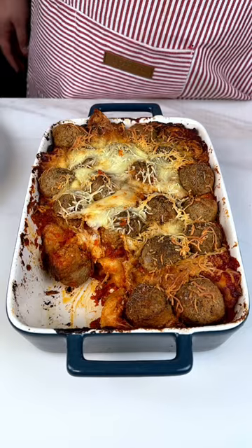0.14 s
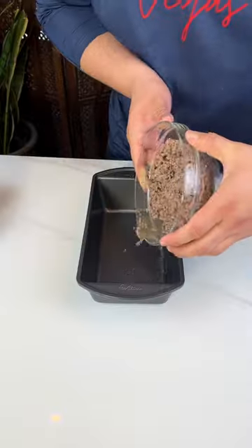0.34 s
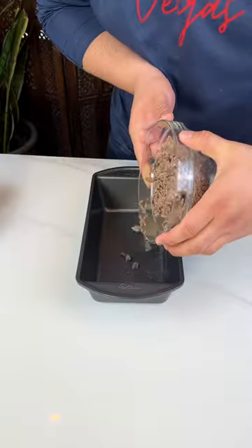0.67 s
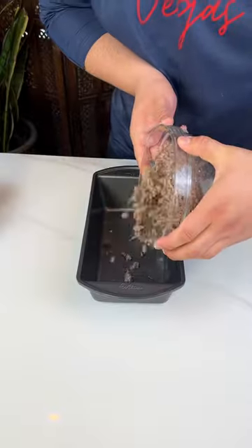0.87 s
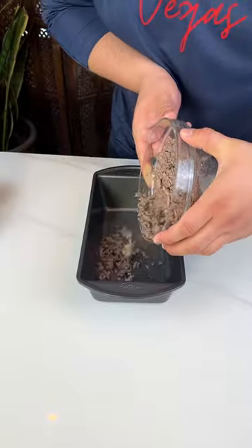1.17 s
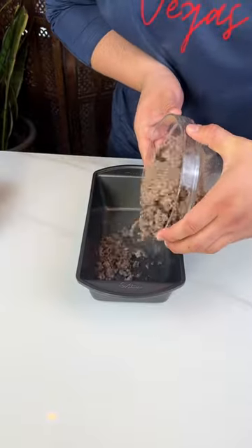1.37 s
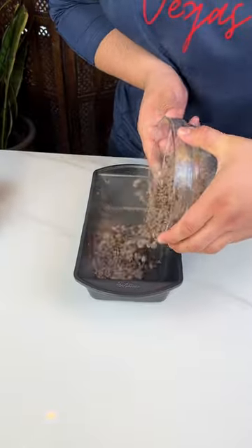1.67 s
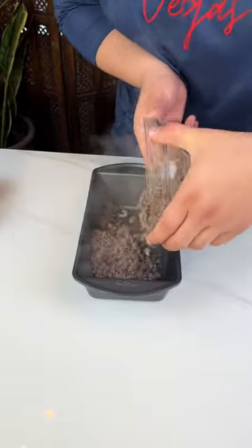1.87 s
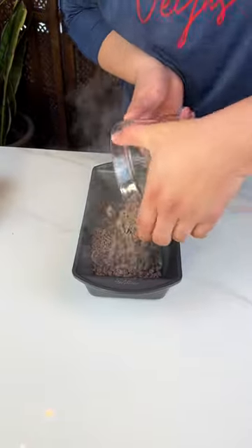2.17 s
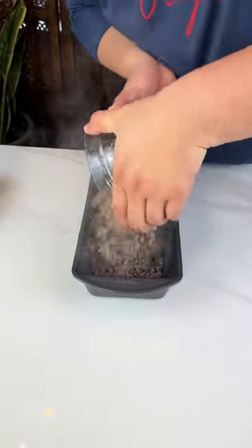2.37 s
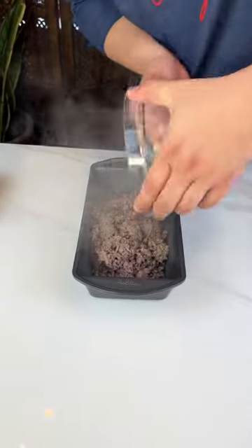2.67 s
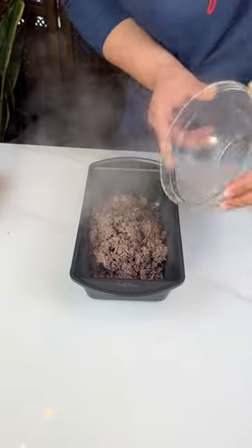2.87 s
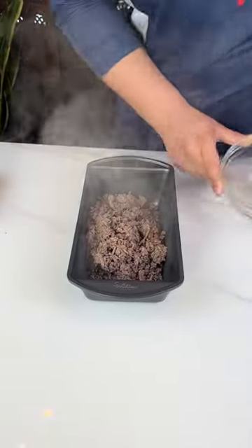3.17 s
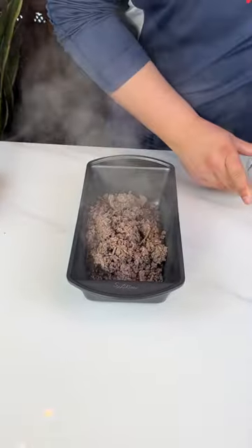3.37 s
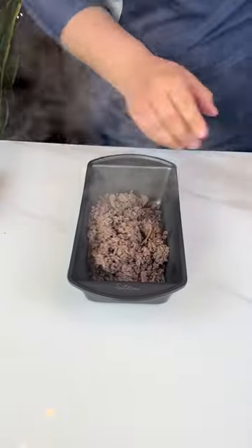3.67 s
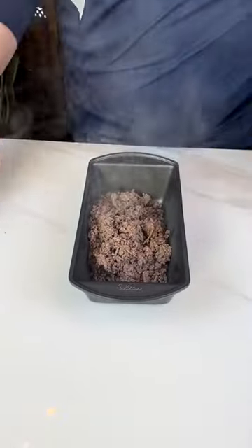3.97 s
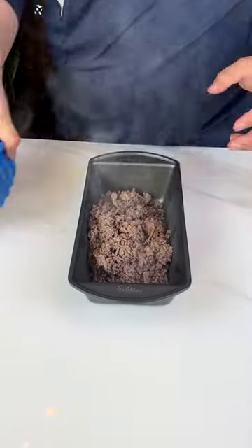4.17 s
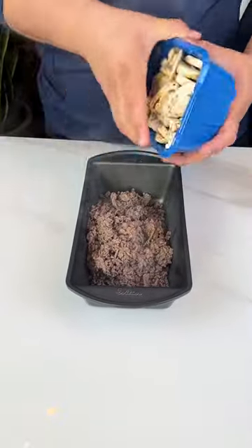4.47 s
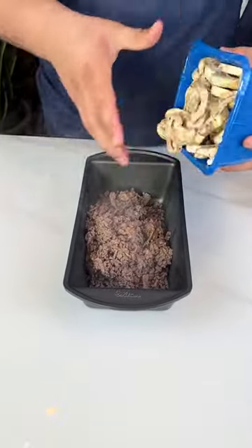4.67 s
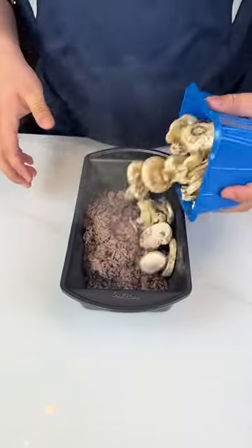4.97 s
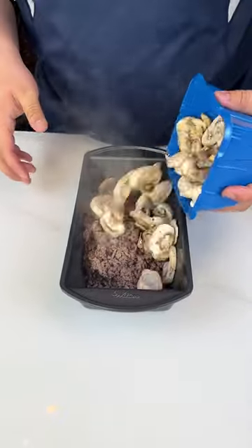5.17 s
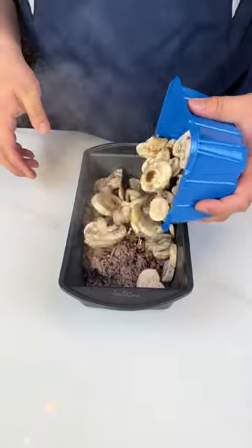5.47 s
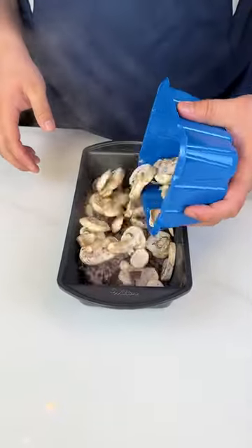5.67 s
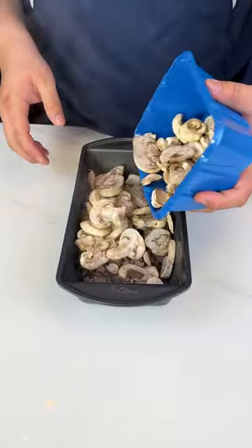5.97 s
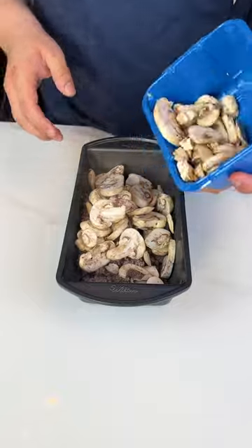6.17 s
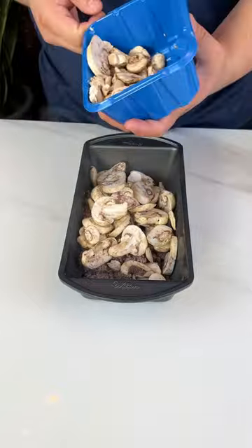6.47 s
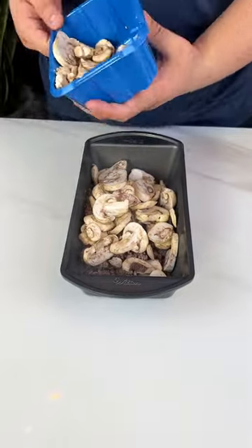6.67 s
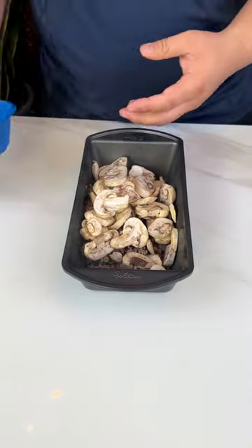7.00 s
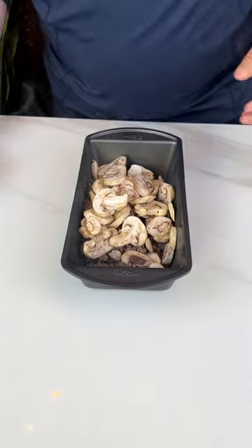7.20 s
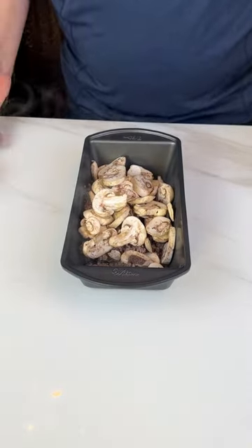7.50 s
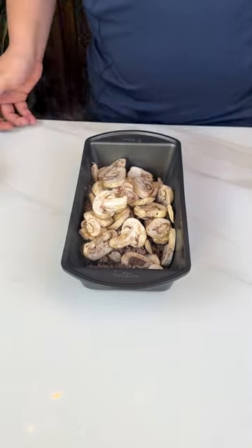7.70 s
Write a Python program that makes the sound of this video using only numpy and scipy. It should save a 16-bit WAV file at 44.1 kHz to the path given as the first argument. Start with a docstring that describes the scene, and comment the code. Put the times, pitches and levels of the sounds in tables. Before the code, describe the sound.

Close kitchen sounds: glass clanking on metal, soft wet food tumbling, two hard countertop knocks, mushrooms thudding into a pan, a plastic tub set down.

```python
"""Cooked mince, then sliced mushrooms, tumble into a metal loaf pan: slaps, pitched plops, wet ticks, bumps.
A glass bowl clanks on the pan twice, then knocks twice on the countertop: noise bursts plus dying modes.
A thin plastic tub crinkles, creaks and scuffs in clusters of noise snaps, and is put down hard.
Behind them lie sleeve swishes and a small, live kitchen: shaped noise with a low rumble and a faint hum.
A close microphone pair turns front and surrounding sound into stereo by mid and side."""
import sys
import numpy as np
from scipy import signal
from scipy.fft import rfft, irfft, next_fast_len
from scipy.io import wavfile
from scipy.ndimage import uniform_filter1d

SR = 44100
rng = np.random.default_rng(int(sys.argv[2]) if len(sys.argv) > 2 else 0)


def wrap_up_sound(samples):
    """Save the sound to the file named by the first command line argument, as 16-bit audio."""
    columns = np.atleast_2d(samples).T
    # keep every value between -1 and 1, then stretch to whole-number steps
    tamed = np.clip(columns, -1, 1)
    steps = np.round(tamed * 32767).astype(np.int16)
    wavfile.write(sys.argv[1], SR, steps)


N = 345826  # length [samples]

# --- all levels are set ahead of the stereo pair; spectrum levels are relative ---
# kitchen noise spectrum: (frequency [Hz], density [dB per Hz])
AIR_SPECTRUM = [(20, -54.5), (36, -10.5), (70, -3), (105, 2.5), (160, -15), (215, -16.5), (300, -17.5),
                (500, -22.5), (1000, -23.5), (2600, -31.5), (3700, -39.5), (7000, -45), (10000, -57.5),
                (13000, -92.5), (16000, -76)]
# a low drone and bands of hiss standing out of it: (frequency [Hz], half width [Hz], boost [dB])
AIR_PEAKS = [(152.4, 3.8, 13), (3070, 102, 6), (4450, 170, 3.5), (6000, 230, 6)]
# kitchen reverberation, time to fall 60 dB: (frequency [Hz], decay [s])
ROOM_T60 = [(100, 0.48), (300, 0.37), (1000, 0.34), (2500, 0.32), (6000, 0.34), (14000, 0.26)]
# reflections off countertop, cupboards and wall: (delay [s], level [dB])
ECHOES = [(0.0023, -26), (0.0061, -19.5), (0.0108, -20)]
# side against mid for sound from the front: (frequency [Hz], level [dB])
FRONT_SIDE = [(60, -76), (250, -42), (700, -10.5), (1500, -7.5), (2100, -9.5), (2800, 4), (4000, -1.5),
              (4800, 1), (5700, -8), (9000, 10.5), (14000, 11.5)]
# side level of sound from all round: (frequency [Hz], level [dB])
ROUND_SIDE = [(60, -52), (130, -28), (300, -12), (700, -4.5), (1500, -12), (3000, 3), (4600, 4),
              (7000, -7.5), (14000, 15)]
# sleeves brush past as the arms swing: (time of the height [s], half length [s], level [dB])
SWISHES = [(3.11, 0.13, -67), (4.718, 0.36, -72), (6.274, 0.024, -72), (6.6, 0.056, -63), (6.796, .04, -67)]
# the tub creaks under the fingers in a run of dull snaps: (start [s], end [s], level [dB])
CREAKS = [(4.565, 4.605, -42.5)]
# the tub buckles sharply: (time [s], level [dB], extra treble tilt [dB/octave], length [s])
CRINKLES = [(3.971, -40.5, 0, 0.025), (4.039, -46.5, 0.5, 0.016), (4.448, -39, -1, 0.03),
            (4.531, -37, -1.5, 0.025), (4.565, -40, 3.5, 0.023), (4.567, -27.5, -14, 0.0013),
            (6.432, -46.5, 2.5, 0.0086), (6.592, -42, 3, .012), (6.604, -34.5, 5, 0.012),
            (6.622, -41, 2, 0.0095), (6.84, -26, -5.5, 0.0071), (6.924, -35.5, -6, 0.0034),
            (6.994, -31, -9, 0.0024), (7.007, -34, -7, 0.0022), (7.024, -29.5, -11, 0.0033),
            (7.0324, -30.5, -3.5, 0.0036), (7.0958, -28, -2, 0.0053), (7.167, -35, 1, 0.013),
            (7.169, -39, -1.5, 0.0034)]
# soft, dull bursts of noise just ahead of three countertop knocks: (time [s], level [dB])
SOFT_BURSTS = [(3.23, -23.5), (3.446, -31), (7.197, -33)]
# hard knocks, one table an object:
# (time [s], ring level [dB], clack level [dB], treble tilt [dB/octave], bass shelf [dB])
PAN_KNOCKS = [(0.7385, -19, -10, 1, 2.5), (0.8648, -28, -14.5, 2, -1.5)]
BOWL_KNOCKS = [(3.2402, -21.5, -4, -1, 7.3), (3.4548, -18, -8, 0.8, 1.2)]
TUB_KNOCKS = [(7.206, -19, -12.5, 0.25, -2)]
# the object rattles again just after a knock: (time [s], level against that knock's clack [dB])
REBOUNDS = [(0.744, -3.5), (0.7507, -2.5), (0.767, -8.5), (0.873, -5), (0.881, -7.5), (3.2507, -11),
            (3.258, -7), (3.273, -12.5), (3.458, -0.5), (3.464, -2.5), (3.475, -4.5), (3.496, -15.5),
            (7.2163, 3), (7.229, -5), (7.239, -10.5), (7.2456, -7.5), (7.256, -15)]
# dense, short-lived part of a knock on the pan: (frequency [Hz], density [dB per Hz])
PAN_CLACK = [(50, -18), (130, -0.5), (250, -4.5), (480, -6), (750, 0), (1500, -7), (2000, -6), (2800, -9.5),
             (4200, -18), (6500, -22), (9500, -33.5), (12000, -68), (16000, -48)]
# the same on the countertop: (frequency [Hz], density [dB per Hz])
COUNTER_CLACK = [(50, -44), (140, -14), (300, -7), (550, -5), (850, 0), (1700, -1), (2500, -3.5),
                 (3500, -13), (6000, -20.5), (9500, -33), (12000, -77), (16000, -46)]
# modes of the loaf pan struck by the bowl:
# (frequency [Hz], t60 [s], level at the first spot [dB], level at the second spot [dB])
PAN_MODES = [(318, .26, -9, -6), (359, .2, -9, -1), (401, .23, -12, -6), (560, .4, -8, -3),
             (597, .3, -9, -10), (649, .19, -2, -6), (728, .24, -2.5, -9), (775, .23, -9, -15),
             (833, .22, -4, -3), (1096, .36, -7, -14), (1150, .24, -7, -1), (1243, .32, -9, -6),
             (1260, .26, -8, -6), (1645, .18, -7, -8), (1816, .21, -11, -5), (1873, .2, -7, -9),
             (1942, .18, -9, -5), (1996, .2, -7, -9), (2095, .35, -24, -9), (2337, .2, -9, -3),
             (2527, .28, -1, -4), (2610, .16, -10, -8), (2736, .17, -1, -11), (2947, .54, -8, -9),
             (3035, .45, -20, -17), (3214, .16, -12, -8), (3800, .16, -16, -18), (4150, .16, -19, -25),
             (4398, .3, -25, -24), (4759, .2, -20, -25), (5190, .11, -20, -20), (5261, .11, -22, -21),
             (6393, .42, -29, -26), (7050, .15, -22, -18), (9650, .14, -26, -22)]
# modes of the glass bowl on the countertop:
# (frequency [Hz], t60 [s], level landing on its edge [dB], level dropping flat [dB])
BOWL_MODES = [(227, .21, -13, -20), (355, .22, -9, -18), (468, .21, -10, -9), (641, .26, -9, -13),
              (727, .21, -2, 1), (778, .31, -11, -7), (833, .24, -6, -15), (884, .26, -4, -14),
              (943, .24, -7, -7), (1020, .3, -11, -10), (1080, .24, -5, -6), (1124, .22, -6, -11),
              (1196, .23, -10, -14), (1292, .44, -3, -12), (1412, .26, -9, -16), (1615, .31, -10, -18),
              (1690, .25, -4, -8), (1778, .22, 2, -10), (1817, .17, -9, -2), (1842, .17, -6, -3),
              (2037, .25, -11, -10), (2105, .27, -9, -10), (2273, .25, -11, -8), (2343, .24, -6, -9),
              (2431, .23, -9, -12), (2977, .35, -20, -18), (3090, .16, -18, -21), (3260, .2, -17, -16),
              (3655, .27, -16, -17), (4152, .16, -26, -9), (4570, .18, -20, -24), (5002, .22, -34, -18),
              (5545, .2, -33, -29), (5911, .17, -24, -22), (7101, .15, -29, -24), (8200, .2, -31, -29),
              (9600, .14, -27, -25)]
# modes of the tub on the countertop: (frequency [Hz], t60 [s], level [dB])
TUB_MODES = [(318, .35, -9), (374, .29, -11), (483, .29, -15), (610, .28, -11), (655, .3, -8),
             (781, .3, -6), (914, .22, -9), (939, .22, -4), (991, .3, -9), (1116, .21, -4), (1174, .26, -7),
             (1250, .24, -7), (1285, .24, 1), (1414, .28, -14), (1540, .24, -3), (1700, .18, -2),
             (1765, .19, 3), (1830, .17, -1), (2060, .2, -9), (2191, .27, -8), (2351, .19, -1),
             (2422, .2, -9), (2541, .22, -8), (2600, .26, -12), (2666, .23, -11), (2889, .18, -17),
             (2990, .15, -13), (3090, .13, -15), (3300, .12, -18), (3440, .24, -16), (3709, .14, -21),
             (4238, .15, -21), (6000, .12, -25)]
# modes of the pan with food weighing on its floor: (frequency [Hz], t60 [s], level [dB])
LOADED_PAN_MODES = [(560, .25, -5), (592, .23, -2), (958, .25, -9), (1050, .35, 0), (1351, .35, -11),
                    (1658, .25, -7), (1943, .25, -7), (2078, .3, -12), (2420, .2, -10), (2584, .3, -10),
                    (2961, .52, -6), (3030, .35, -13)]
# food strikes bare metal and the pan rings: (time [s], level [dB], frequency that answers most [Hz])
PAN_RINGS = [(1.545, -36.5, 700), (1.602, -46, 1000), (1.717, -54, 2200), (1.792, -54, 890),
             (2.378, -43, 720), (4.948, -35, 1800), (4.991, -32.5, 1230), (5.041, -39.5, 1280),
             (5.128, -50.5, 3000), (5.16, -43, 1050), (5.242, -32, 550), (5.767, -55, 2640),
             (5.773, -33, 570), (5.792, -47, 990)]
# clearest wet clicks, food peeling off its container or slapping down, and the last two are bright snaps as the
# tub scuffs the countertop: # (time [s], level [dB], centre [Hz], length [s])
SQUELCHES = [(0.527, -56, 8500, .009), (1.675, -54, 6740, .004), (1.83, -53, 6000, 0.037),
             (1.933, -46, 6500, 0.0016), (1.962, -47, 4440, 0.0018), (1.996, -39, 3900, 0.0021),
             (2.04, -40.5, 4330, 0.0027), (2.056, -39, 2970, 0.004), (2.097, -44, 4000, 0.0028),
             (2.16, -41, 7340, 0.001), (4.462, -44, 4800, 0.002), (4.807, -45, 5700, 0.0026),
             (4.909, -43, 4400, .0015), (4.945, -36, 2090, 0.0046), (5, -41, 1950, .003),
             (5.041, -38, 4140, 0.0042), (5.331, -49, 4370, 0.002), (5.428, -49, 2600, 0.0022),
             (5.462, -48, 4000, .002), (5.504, -53, 4000, .0015), (5.52, -49, 4300, 0.0034),
             (5.529, -50, 4300, 0.0027), (5.763, -47, 2820, 0.0073), (6.074, -49, 2470, 0.004),
             (6.973, -39, 2330, 0.0037), (7.02, -34, 2170, 0.004)]
# spectrum of tumbling food: (frequency [Hz], density [dB per Hz])
TUMBLE_SPECTRUM = [(70, 1), (130, 9.5), (200, 11.5), (400, 4), (600, 5.5), (1100, 0), (1600, -18),
                   (2600, -19.5), (4000, -20), (7000, -27.5), (10000, -51), (16000, -49)]
# a heap of food gives way and slides:
# (time of full flow [s], hold [s], level [dB], fine patter against that level [dB]; the last is not played)
SLIDES = [(1.04, .01, -47, -4), (1.564, 0.097, -45.5, 0), (1.753, .04, -55, -3), (2.414, 0.026, -49, -4),
          (4.973, 0.097, -38, -12), (5.193, 0.15, -44.5, -14), (5.418, 0.33, -46, -9),
          (5.78, 0.018, -41.5, -10), (5.95, .02, -45.5, -15)]
# heaviest mushrooms and lumps of mince landing in the pan or falling back in the tub:
# (time [s], level [dB], centre [Hz], hardness [0 on food, 1 on bare metal], plop time to peak [s])
THUDS = [(1.37, -44, 914, .45, .004), (1.428, -53, 900, .4, .003), (1.546, -45, 660, 1, 0.008),
         (1.604, -41.5, 877, 1, 0.0089), (1.717, -48.5, 1200, 0.95, 0.0013),
         (1.792, -46, 885, 0.91, 0.0044), (2.262, -44, 595, 0.4, 0.0071), (2.378, -44.5, 686, 0.95, 0.0081),
         (4.822, -28, 540, 0.66, 0.0033), (4.838, -38.5, 1745, 0.11, 0.0027),
         (4.881, -46, 1000, 0.89, .002), (4.935, -41, 980, .7, 0.0044), (4.947, -29.5, 1045, 0.73, 0.0034),
         (4.991, -35, 1052, 0.8, 0.0069), (5.041, -32, 874, 0.88, 0.0034), (5.05, -29, 405, .05, 0.0047),
         (5.057, -30.5, 328, .05, .005), (5.069, -30.5, 646, 0.26, 0.0086), (5.224, -41, 1190, .2, 0.0023),
         (5.241, -34.5, 646, 0.37, 0.003), (5.422, -44, 1090, 0.76, 0.0017), (5.44, -47, 796, 0.6, 0.0035),
         (5.514, -40.5, 1125, 0.82, 0.0047), (5.545, -40, 960, .3, 0.0045),
         (5.643, -45.5, 1000, 0.42, .002), (5.766, -36.5, 625, 0.83, 0.0044), (5.791, -42, 581, .1, 0.011),
         (5.858, -31.5, 398, 0.67, 0.0022), (5.907, -40, 990, 0.27, 0.003), (5.962, -32, 960, 0.22, 0.0019),
         (6.016, -35, 340, 0.41, 0.003), (6.075, -35.5, 930, 0.63, 0.002), (6.337, -46, 990, 0.089, .003),
         (6.844, -27, 401, 0.69, 0.0063), (7.101, -27, 401, 0.13, 0.0054), (7.177, -32, 938, 0.28, 0.0075),
         (7.25, -18.5, 917, 0.11, 0.0052)]

RUMBLE_DB, RUMBLE_SINK_DB_PER_S = -44, 0.38  # the room noise eases off slowly
RUMBLE_TOP_HZ = 140
HUSH_END_S, HUSH_DB, HUSH_BASS_DB = 0.208, -4, -11  # quieter at first; the bass drops by both amounts
HUM_START_S, HUM_END_S, HUM_RISE_S = 2.44, 3.24, 0.041
HUM_HZ, HUM_CLIMB_HZ_PER_S, HUM_TOP_HZ = 162, 54, 197  # climbs, then levels off
HUM_DB, HUM_FADE_DB_PER_S = -50.5, 14
WRAP_HZ, WRAP_WIDTH_HZ = 4960, 270  # around here the lead of the left port turns into a lag
PORT_HZ, PORT_WIDTH_HZ, PORT_PEAK_DB = 15400, 632, 6  # resonance of both ports
EDGE_HZ = 16000  # top of the finished band
SWISH_HZ = 6850
SCRAPE_START_S, SCRAPE_END_S, SCRAPE_LOW_HZ, SCRAPE_HIGH_HZ = 6.95, 7.068, 537, 1140
SCRAPE_DB, SCRAPE_FADE_DB, SCRAPE_PEAK = -31.5, 12, 0.44  # loudest at this share of its length
SLIP_DB, SLIP_OCTAVES = 3, 0.35  # spread of the slips either way
SCATTER_DB, SCATTER_OCTAVES = 7, 0.93  # spread of the creak snaps either way
CREAK_HZ, CREAK_TOP_HZ, CREAK_TILT_DB, CREAK_SNAP_S = 1350, 2650, -19, 0.0042  # tilt in dB/octave
TUB_HZ = 956  # centre of the thin wall's snap
SLAP_TOP_HZ, SNAP_TOP_HZ = 2560, 7170  # soft food reaches less high than plastic or wet films
SOFT_BURST_TILT_DB = -10  # treble, dB/octave
RATTLE_S = 0.08  # rebounds this soon after a knock belong to it
LAG_HZ = 899  # below this the body answers late
RING_FOCUS_DB = 13  # other modes are weaker by this much an octave
BUMP_PEAK_DB, BUMPS_PER_S = 15, 115
GATHER_DB_PER_S, SETTLE_DB_PER_S = 102, 102  # slopes of a slide building up and settling
SOFT_TILT_DB, HARD_TILT_DB = -31, 11.5  # treble of a landing, dB/octave
PLOP_DB = -2  # gain of the plop within a thud


def gain_of(db):
    """Decibels to amplitude."""
    return 10 ** (np.asarray(db) / 20)


def evened(x):
    """Scales to rms 1."""
    return x / np.sqrt(np.mean(x ** 2) + 1e-20)


def read(points, hz):
    """Reads a frequency table on a logarithmic axis."""
    f, value = np.transpose(points)
    return np.interp(np.log(hz + 1), np.log(f + 1), value)


def add(mix, s, sound):
    """Mixes a sound in at s seconds."""
    part = mix[:, round(s * SR):][:, :sound.shape[1]]
    part += sound[:, :part.shape[1]]


def octaves(hz, centre_hz):
    """Distance in octaves above a centre."""
    return np.log2((hz + 1) / centre_hz)


def noise(n, colour):
    """Two unrelated noises, together of rms 1, with the spectrum colour(hz) in dB."""
    hz = np.fft.rfftfreq(n, 1 / SR)
    phases = np.exp(2j * np.pi * rng.random((2, len(hz))))
    return evened(irfft(phases * gain_of(colour(hz)), n))


def hump(centre_hz, tilt_db, top_hz, slope_db, width):
    """A broad resonance whose treble skirt can be tilted; the very top falls away."""
    def colour(hz):
        above = octaves(hz, centre_hz)
        skirts = -slope_db * np.hypot(above, width)
        return skirts + tilt_db * np.maximum(above, 0) - 15 * np.maximum(octaves(hz, top_hz), 0)
    return colour


def burst(colour, length, room_db, rise=0.00077):
    """A blow decays exponentially at the pace of its length; the kitchen rings on, band by band."""
    n = SR // 2
    t = np.arange(n) / SR
    near = noise(n, colour) * np.exp(-t / max(length, .001))
    hz, at, bands = signal.stft(noise(n, colour), SR, nperseg=256)
    fading = bands * gain_of(-60 * at / read(ROOM_T60, hz)[:, None])
    tail = signal.istft(fading, SR, nperseg=256)[1][:, :n]
    tail = tail * (1 - np.exp(-t / 0.0033))  # the room answers gradually
    return (near + gain_of(room_db) * tail) * (1 - np.exp(-t / rise))


def ring(mode_hz, t60, mode_db):
    """One second of sine modes, each dying at its own rate."""
    t = np.arange(SR) / SR
    turns = mode_hz * t + rng.random((2, len(mode_hz), 1))
    modes = gain_of(mode_db - 60 * t / t60) * np.sin(2 * np.pi * turns)
    return modes.sum(1) * (1 - np.exp(-t / 0.00062))


def patter(grain, per_s):
    """Repeats a grain at random moments and in uneven sizes."""
    sizes = gain_of(2.5 * np.minimum(rng.exponential(1, N), 3))
    strikes = sizes * (rng.random(N) < per_s / SR)
    return signal.oaconvolve(strikes[None], grain, axes=1)[:, :N]


def echoed(x):
    """Nearby surfaces lay a fixed ripple on the spectrum."""
    out = x.copy()
    for delay, db in ECHOES:
        add(out, delay, gain_of(db) * x)
    return out


def dispersed(x, lag):
    """Slow bending waves bring the bass out a little after the treble."""
    n = next_fast_len(N + SR // 10)
    delay = lag / (1 + (np.fft.rfftfreq(n, 1 / SR) / LAG_HZ) ** 4)
    phase = 2 * np.pi * np.cumsum(delay) * SR / n  # group delay summed over frequency
    return irfft(rfft(x, n) * np.exp(-1j * phase), n)[:, :N]


def ports(pair, front_db, round_db):
    """The left port leads for frontal sound until the phase wraps; surrounding sound widens the pair."""
    n = next_fast_len(N + SR // 10)
    hz = np.fft.rfftfreq(n, 1 / SR)
    mid, other = rfft(pair, n)
    lead = 1j * np.exp(1j * np.pi * (1 + np.tanh((hz - WRAP_HZ) / WRAP_WIDTH_HZ)) / 2)
    front_side = lead * mid * gain_of(read(FRONT_SIDE, hz) + front_db)
    side = front_side + other * gain_of(read(ROUND_SIDE, hz) + round_db)
    resonance = gain_of(PORT_PEAK_DB / (1 + ((hz - PORT_HZ) / PORT_WIDTH_HZ) ** 2))
    return irfft(resonance * np.array([mid + side, mid - side]), n)[:, :N]


def hum():
    """A faint sine climbs in pitch, levels off and fades."""
    t = np.arange(N) / SR
    age = np.maximum(t - HUM_START_S, 0)
    sounding = np.clip(np.minimum(age, HUM_END_S - t) / HUM_RISE_S, 0, 1)
    pitch_hz = np.minimum(HUM_HZ + HUM_CLIMB_HZ_PER_S * age, HUM_TOP_HZ)
    tone = np.sqrt(2) * np.sin(2 * np.pi * np.cumsum(pitch_hz) / SR)  # rms 1
    return sounding * gain_of(HUM_DB - HUM_FADE_DB_PER_S * age) * tone


def air():
    """Low rumble and hiss of the kitchen as shaped noise, with the hum on top."""
    def colour(hz):
        peaks = sum(db / (1 + ((hz - peak_hz) / width) ** 2) for peak_hz, width, db in AIR_PEAKS)
        return read(AIR_SPECTRUM, hz) + peaks
    t = np.arange(N) / SR
    hushed = t < HUSH_END_S
    level_db = RUMBLE_DB - RUMBLE_SINK_DB_PER_S * t + HUSH_DB * hushed
    out = noise(next_fast_len(N), colour)[:, :N] * gain_of(level_db)
    low_pass = signal.butter(2, RUMBLE_TOP_HZ, fs=SR, output="sos")
    bass = signal.sosfiltfilt(low_pass, out)
    return out - bass + bass * gain_of(HUSH_BASS_DB * hushed) + hum()


def swishes():
    """Cloth gives a soft hiss that swells and fades with each swing of an arm."""
    t = np.arange(N) / SR
    swing = sum(gain_of(db) * np.exp(-((t - s) / half) ** 2) for s, half, db in SWISHES)
    cloth = hump(SWISH_HZ, 0, SNAP_TOP_HZ, slope_db=23, width=0.21)
    return swing * noise(next_fast_len(N), cloth)[:, :N]


def scrape(count=20):
    """The tub scuffs in quick, uneven slips that climb in pitch, swell and fade."""
    out = np.zeros((2, N))
    for k, (when, size, pitch) in enumerate(rng.random((count, 3))):
        along = (k + when) / count
        path_hz = SCRAPE_LOW_HZ * (SCRAPE_HIGH_HZ / SCRAPE_LOW_HZ) ** along
        hz = path_hz * 2 ** (SLIP_OCTAVES * (2 * pitch - 1))
        db = SCRAPE_DB - SCRAPE_FADE_DB * abs(along - SCRAPE_PEAK) + SLIP_DB * (2 * size - 1)
        colour = hump(hz, 0, CREAK_TOP_HZ, slope_db=17, width=0.23)
        slip = burst(colour, length=0.0032, room_db=-16.5, rise=0.0003)
        add(out, SCRAPE_START_S + along * (SCRAPE_END_S - SCRAPE_START_S), gain_of(db) * slip)
    return out


def scatter(start, end, db, hz, count):
    """Small events spread unevenly over a stretch of time: rows of (time [s], level [dB], centre [Hz])."""
    when, size, pitch = rng.random((count, 3)).T
    s = start + (end - start) * (np.arange(count) + when) / count
    levels = db + SCATTER_DB * (2 * size - 1)
    return np.transpose([s, levels, hz * 2 ** (SCATTER_OCTAVES * (2 * pitch - 1))])


def creaks():
    """Dull snaps: (time [s], level [dB], centre [Hz], tilt [dB/octave], top [Hz], length [s])."""
    return [(s, db, hz, CREAK_TILT_DB, CREAK_TOP_HZ, CREAK_SNAP_S)
            for start, end, creak_db in CREAKS
            for s, db, hz in scatter(start, end, creak_db, CREAK_HZ, count=6)]


def crinkles():
    """Thin plastic buckles in clusters of tiny snaps; the longer ones build up more gently."""
    out = np.zeros((2, N))
    buckles = [(s, db, TUB_HZ, tilt_db, SNAP_TOP_HZ, length) for s, db, tilt_db, length in CRINKLES]
    for s, db, hz, tilt_db, top_hz, length in buckles + creaks():
        colour = hump(hz, tilt_db, top_hz, slope_db=6.5, width=0.27)
        snap = burst(colour, length, room_db=-14.5, rise=0.0056 * (length / 0.016) ** 2)
        clumps = evened(uniform_filter1d(rng.standard_normal(snap.shape[1]), size=90))
        add(out, s, gain_of(db) * snap * evened(gain_of(2 * clumps)))
    return out


def soft_bursts():
    """A soft, dull noise burst swells quickly just before a knock."""
    def colour(hz):
        return read(COUNTER_CLACK, hz) + SOFT_BURST_TILT_DB * np.maximum(octaves(hz, CREAK_TOP_HZ), 0)
    out = np.zeros((2, N))
    for s, db in SOFT_BURSTS:
        add(out, s, gain_of(db) * burst(colour, length=0.031, room_db=-15.0, rise=0.0024))
    return out


def clack_colour(clack, mode_hz, spot_db, tilt_db, bass_db):
    """While the surfaces touch, the clack gathers round the modes, most round those that stand out."""
    standing = spot_db - read(clack, mode_hz)
    height_db = np.clip(11.5 + 0.6 * (standing - np.median(standing)), 4, 18)

    def colour(hz):
        near_mode_db = (height_db / (1 + ((hz - mode_hz) / (0.0075 * mode_hz)) ** 2)).max(0)
        peaks_db = (near_mode_db - 3) / (1 + (hz / 8000) ** 2)
        treble_db = tilt_db * np.maximum(octaves(hz, 1470), 0)
        return read(clack, hz) + peaks_db + treble_db + bass_db / (1 + (hz / 300) ** 2)
    return colour


def knocks(rows, modes, clack, length, room_db, lag):
    """Each knock is a clack, its rebounds and the object's modes, weighted by the spot that is struck."""
    out = np.zeros((2, N))
    mode_hz, t60, *spots = np.transpose(modes)[:, :, None]
    for (s, ring_db, clack_db, tilt_db, bass_db), spot_db in zip(rows, spots):
        colour = clack_colour(clack, mode_hz, spot_db, tilt_db, bass_db)
        add(out, s, gain_of(ring_db) * ring(mode_hz, t60, spot_db))
        rebounds = [(at, db) for at, db in REBOUNDS if s < at < s + RATTLE_S]
        for at, db in [(s, 0)] + rebounds:
            add(out, at, gain_of(clack_db + db) * burst(colour, length, room_db, rise=0.00029))
    return dispersed(out, lag)


def pan_rings():
    """Bare metal rings on under a falling piece; where it is hit decides which modes answer most."""
    out = np.zeros((2, N))
    mode_hz, t60, mode_db = np.transpose(LOADED_PAN_MODES)[:, :, None]
    for s, db, hz in PAN_RINGS:
        focused_db = mode_db - RING_FOCUS_DB * abs(octaves(mode_hz, hz))
        add(out, s, gain_of(db) * ring(mode_hz, t60, focused_db))
    return out


def squelches():
    """Wet films, and the scuffing tub, snap with a bright tick."""
    out = np.zeros((2, N))
    for s, db, hz, length in SQUELCHES:
        colour = hump(hz, 0, SNAP_TOP_HZ, slope_db=19.5, width=0.051)
        add(out, s, gain_of(db) * burst(colour, length, room_db=-17.5, rise=0.001))
    return out


def flow(slides):
    """How much food is moving: each slide gathers, holds and settles; the strongest counts."""
    t = np.arange(N) / SR
    levels = []
    for s, hold, db, *_ in slides:
        gathering = GATHER_DB_PER_S * np.maximum(s - t, 0)
        settling = SETTLE_DB_PER_S * np.maximum(t - s - hold, 0)
        levels.append(db - gathering - settling)
    return gain_of(np.max(levels, 0))


def tumble(count=16):
    """Pieces rub and topple: many small bumps over a range of resonances."""
    out = np.zeros((2, N))
    for bump_hz in np.geomspace(300, 2400, count):
        def colour(hz):
            peak = BUMP_PEAK_DB * np.exp(-(octaves(hz, bump_hz) / 0.31) ** 2)
            return read(TUMBLE_SPECTRUM, hz) + peak
        bump = burst(colour, length=0.0042, room_db=-14.5, rise=0.001)
        out += patter(bump, BUMPS_PER_S / count)
    return evened(out) * flow(SLIDES)


def thuds():
    """Pieces land with a noise slap, brighter on bare metal, and a pitched plop."""
    out, t = np.zeros((2, N)), np.arange(SR // 2) / SR
    for s, db, hz, hardness, plop_s in THUDS:
        tilt_db = SOFT_TILT_DB + (HARD_TILT_DB - SOFT_TILT_DB) * hardness
        swell = (t / plop_s) * np.exp(1 - t / plop_s)  # peaks at plop_s
        plop = np.sin(2 * np.pi * (hz * t + rng.random((2, 1)))) * swell
        colour = hump(hz, tilt_db, SLAP_TOP_HZ, slope_db=14.5, width=0.85)
        slap = burst(colour, length=0.0053, room_db=-12, rise=0.00012)
        add(out, s, gain_of(db) * (slap + gain_of(PLOP_DB) * plop))
    return out


def scene():
    """Kitchen, tub, knocks and food; the countertop knocks come from slightly to the right."""
    room = ports(echoed(air()), front_db=-10, round_db=0.0)
    tub = knocks(TUB_KNOCKS, TUB_MODES, COUNTER_CLACK, length=0.0073, room_db=-13, lag=0.00198)
    bowl = knocks(BOWL_KNOCKS, BOWL_MODES, COUNTER_CLACK, length=0.0073, room_db=-13.0, lag=0.0015)
    counter = ports(bowl + tub + soft_bursts(), front_db=-4, round_db=-6.0)
    counter = counter * gain_of([[-.5], [.5]])
    pan = knocks(PAN_KNOCKS, PAN_MODES, PAN_CLACK, length=0.0088, room_db=-12.5, lag=0.00434)
    handling = swishes() + scrape() + crinkles()
    food = pan_rings() + squelches() + echoed(tumble()) + thuds()
    return (room + counter + ports(pan, front_db=-3.5, round_db=-6.5)
            + ports(handling + food, front_db=-5.0, round_db=-7.5))


def record(dry):
    """The loudest peaks are rounded off; then a low-pass limits the band."""
    rounded = dry / (1 + dry ** 4) ** (1 / 4)
    low_pass = signal.firwin(511, EDGE_HZ, window=("kaiser", 9), fs=SR)
    return signal.oaconvolve(rounded, low_pass[None], "same")


dry = scene()
out = record(dry)
wrap_up_sound(out)
```